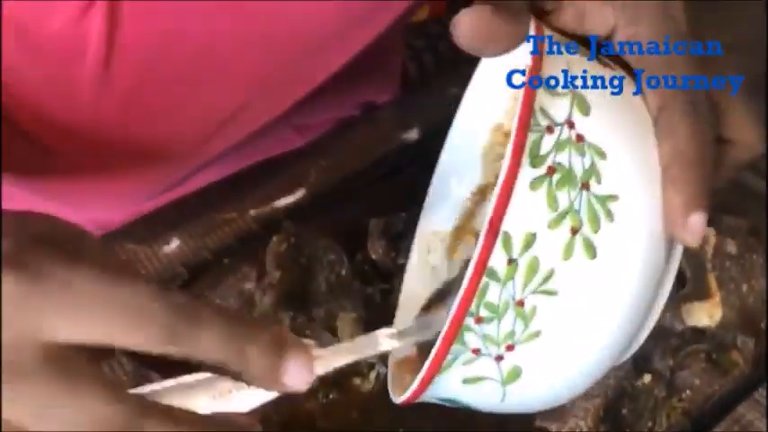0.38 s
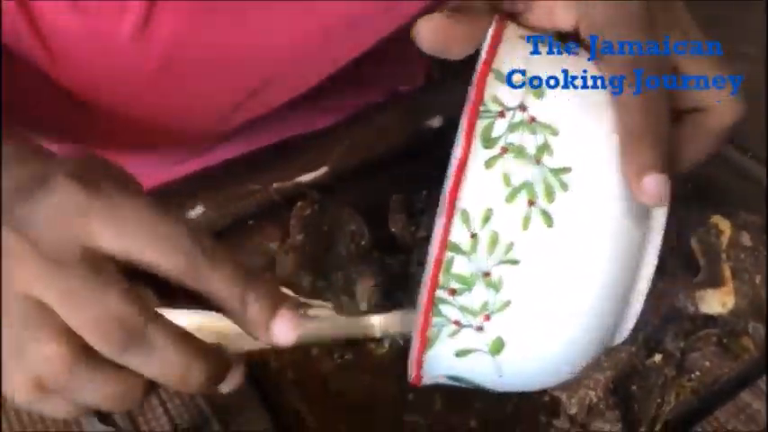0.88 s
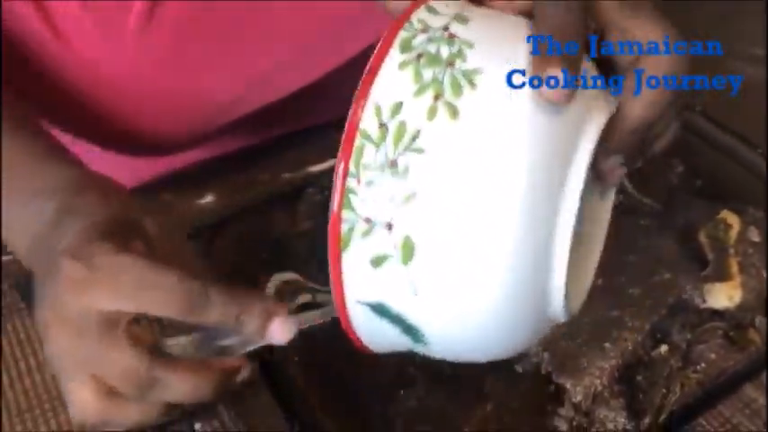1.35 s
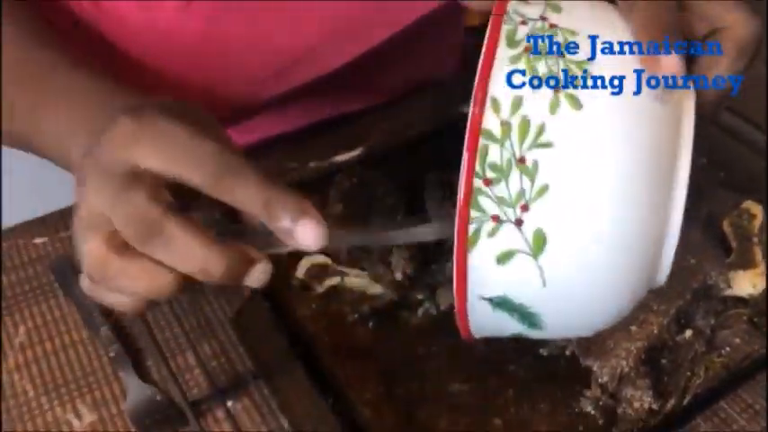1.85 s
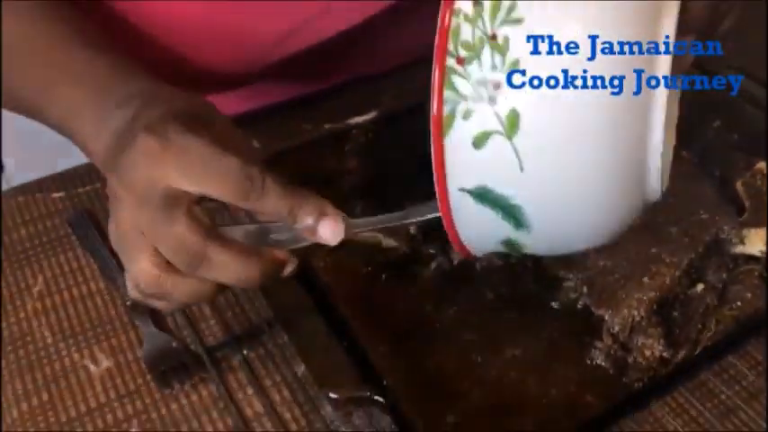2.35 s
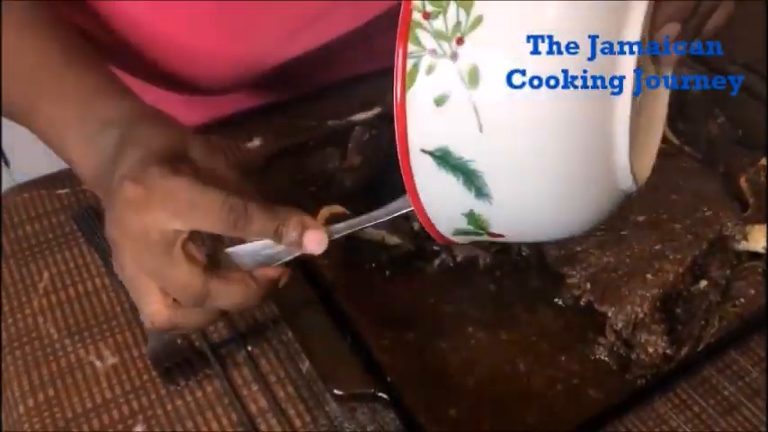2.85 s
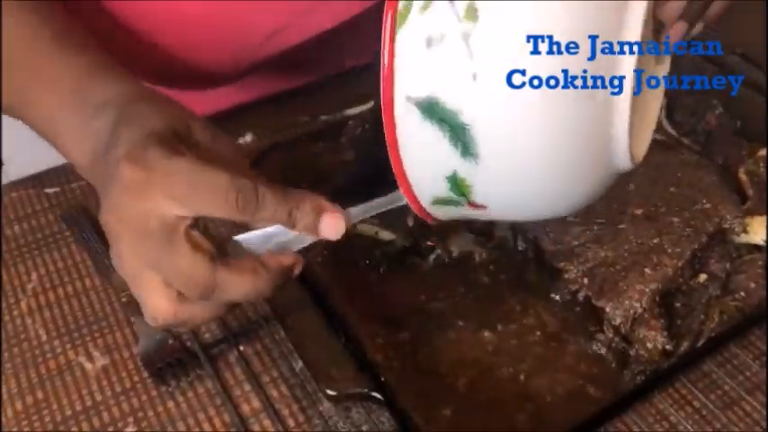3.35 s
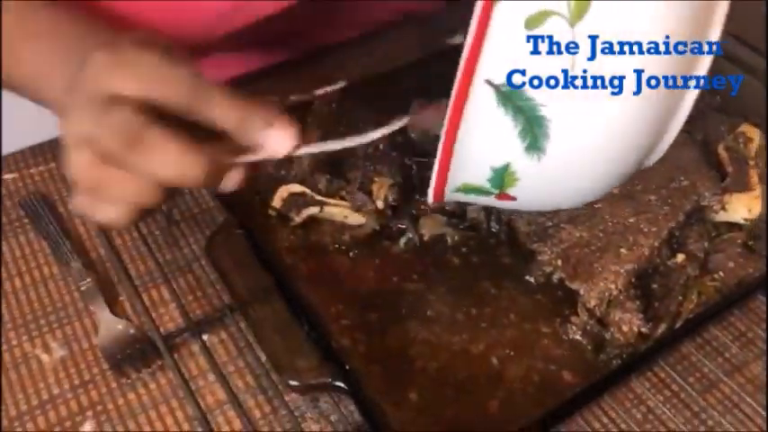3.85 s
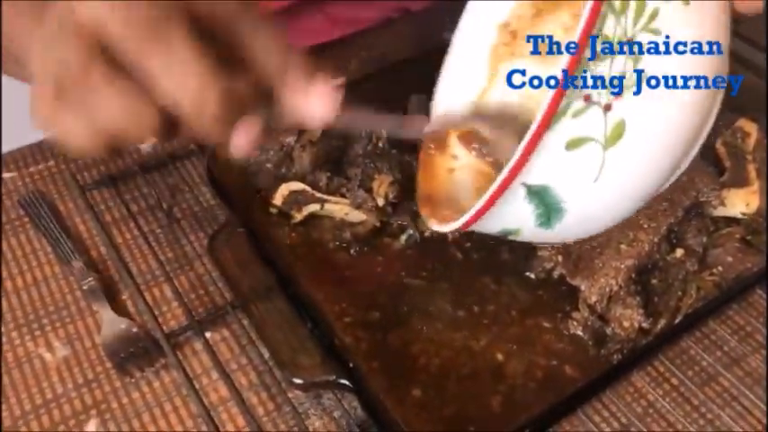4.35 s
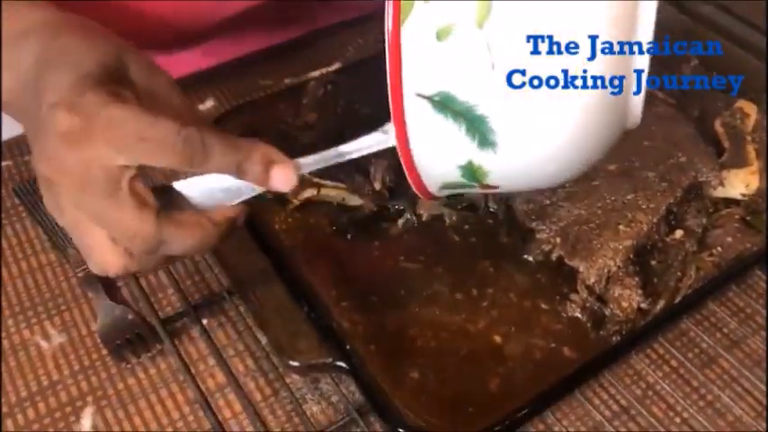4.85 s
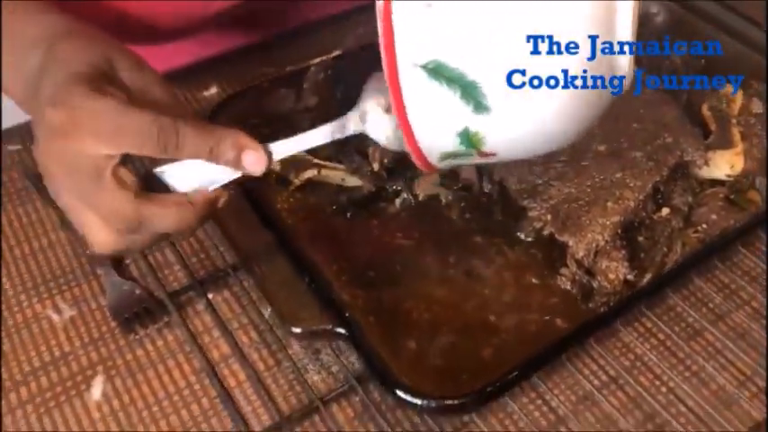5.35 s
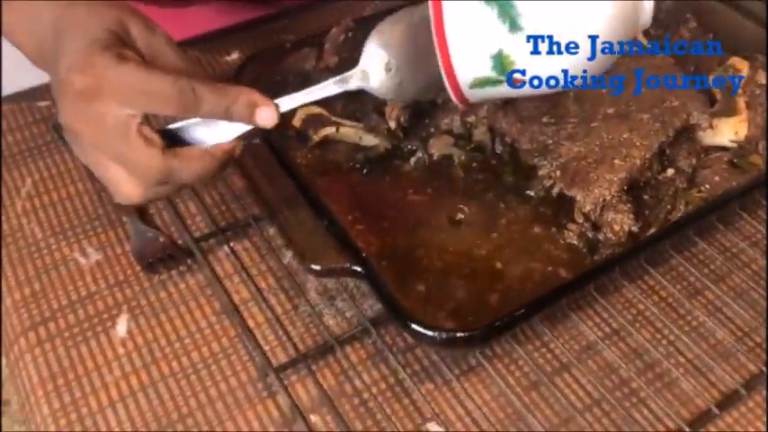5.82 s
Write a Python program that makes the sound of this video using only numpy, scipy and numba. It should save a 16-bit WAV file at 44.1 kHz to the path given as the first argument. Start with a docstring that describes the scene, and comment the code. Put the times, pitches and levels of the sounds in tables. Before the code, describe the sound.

A metal spoon scrapes sauce from a hand-held ceramic bowl in quick strokes, with sharp clinks, wet rising swishes and small squeaks in a quiet kitchen.

```python
"""A steel spoon scrapes sauce out of a hand-held ceramic bowl in a quiet kitchen, close to one microphone.
A low rumble and a faint hiss run throughout. The scene opens on the fading tail of a clink; then strokes land
with a clink, many bounce, and the spoon drags or sweeps along the glaze. Bowl and spoon ring as sets of fading
tones. The rubbing hisses through the air gap under the spoon at a rising pitch; at times the edge squeals.
Around 3 s the touches are soft; firmer strokes follow to the end. The room adds a short tail to all of them."""
import sys
import numpy as np
from scipy import signal
from scipy.fft import rfft, irfft
from scipy.io import wavfile
from scipy.ndimage import uniform_filter1d
from numba import njit

SR = 44100
rng = np.random.default_rng(int(sys.argv[2]) if len(sys.argv) > 2 else 0)


def natural_amplitude(level_db):
    """Convert a level in decibels to a linear amplitude factor, elementwise."""
    exponent = np.asarray(level_db, float) / 20
    return 10 ** exponent


def to_wav(sig):
    """Store sig (one row per channel, or 1-D mono) as 16-bit WAV at the path in sys.argv[1].

    Samples outside -1..1 are clipped; the rate is SR.
    """
    pcm = np.clip(np.atleast_2d(sig), -1, 1) * 32767
    pcm = np.round(pcm).astype(np.int16)
    wavfile.write(sys.argv[1], SR, pcm.T)  # frames by channels


N = 262836  # length in samples

# Blows of the spoon on the bowl, before hardness and chance change their tone:
# (time [s], crack level [dB], bowl ring level [dB], spoon ring level [dB], bowl's lowest mode level [dB])
BLOWS = [(0.2016, -3, -52, -17, -17), (0.4652, -4.5, -53, -23.5, -22), (0.5054, -5, -25, -15, -18.5),
         (0.5128, -18, -38, -24.5, -52), (0.7478, -3.5, -48, -19, -19.5),
         (0.9889, -5.5, -12.5, -26.5, -22.5), (1.0051, -17.5, -15, -23, -18.5),
         (1.0147, -8.5, -36, -23, -28), (1.0255, -4, -21, -19, -31), (1.141, -8.5, -21.5, -44, -45),
         (1.3658, -12, -44, -21, -28), (1.702, 0.5, -21.5, -23.5, -29), (1.8105, -20, -26, -65, -37.5),
         (1.975, -55, -49, -60, -73), (1.9977, -4.5, -15, -37, -31), (2.007, -24, -19, -25, -27),
         (2.0204, -22, -14, -36.5, -37.5), (2.319, -50, -63.5, -54, -65),
         (2.3407, -3.5, -13.5, -21.5, -22.5), (2.3551, -20, -7.5, -48, -13.5),
         (2.3992, -28.5, -18.5, -36, -46), (2.655, -50, -69, -64, -67.5), (2.6965, -9, -49, -18.5, -29),
         (2.724, -11.5, -21.5, -49.5, -57), (2.7624, -26.5, -34, -44, -57), (2.8579, -47, -30, -56, -66),
         (3.067, -45.5, -51.5, -59.5, -57), (3.1712, -47.5, -54, -62.5, -61), (3.3059, -7, -32.5, -23, -34),
         (3.437, -3, -12.5, -39, -32.5), (3.7805, -6.5, -13, -21.5, -28),
         (3.9094, -26.5, -16.5, -43.5, -60), (3.924, -27, -17.5, -55, -63),
         (4.2871, -10.5, -31, -29, -29.5), (4.297, -12.5, -64.5, -51, -66), (4.5396, -17, -23.5, -47, -62),
         (4.7742, -3.5, -15.5, -27, -25.5), (4.7873, -14, -33.5, -24.5, -61),
         (4.8457, -16, -23.5, -49.5, -33.5), (5.2241, -8.5, -18, -25.5, -18),
         (5.2353, -16, -21.5, -33.5, -20), (5.6983, -3, -11, -63, -13),
         (5.7125, -23.5, -16.5, -47.5, -16.5), (5.816, -35, -35, -48, -59), (5.9291, -36, -39, -69, -65)]
# Modes, the tones a body rings with; the hand-held bowl's come in close pairs. Blows vary them slightly:
# (frequency [Hz], relative level [dB], time to fade by 60 dB after a blow [s])
BOWL_MODES = [(939.4, -1.5, 0.1), (2180, -29.5, 0.18), (2270, 1, 0.07), (2316, -3, 0.057),
              (4068, 3.5, 0.039), (4117, -10.5, 0.16), (5970, -14.5, 0.024), (6280, -3, 0.041),
              (6378, -13.5, 0.15), (8896, -11.5, 0.06), (10050, -21, 0.048), (11200, -29, 0.093)]
# The spoon's modes: (frequency [Hz], relative level [dB], time to fade by 60 dB after a blow [s])
SPOON_MODES = [(1950, -13.5, 0.17), (2050, -11, 0.31), (2900, -12, 0.087), (3510, -26, 0.32),
               (4500, -1, 0.061), (4690, 0.5, 0.057), (5250, -4.5, 0.098), (5487, -27, 0.062),
               (6640, -36.5, .12), (7270, -1.5, 0.024), (7526, -1.5, 0.11), (8200, -5, 0.042),
               (7710, -17, .07), (9720, -11, 0.092), (10540, -10, 0.064), (11410, -13, 0.088),
               (12620, -18, 0.037)]


def unit(x):
    """Scales a sound to rms 1."""
    return x / np.sqrt(np.mean(x ** 2))


def shape(points, hz):
    """Reads the gain at hz from (frequency [Hz], level [dB]) points on a log-frequency axis."""
    f, db = np.transpose(points)
    return natural_amplitude(np.interp(np.log(hz + 1), np.log(f), db))


def coloured(x, points):
    """Filters a sound with a curve of (frequency [Hz], level [dB]) points."""
    gain = shape(points, np.fft.rfftfreq(len(x), 1 / SR))
    return irfft(rfft(x) * gain, len(x))


def pole(hz, t60):
    """Gives one sample's turn and decay of a mode, as a complex factor."""
    return np.exp(2j * np.pi * hz / SR - np.log(1000) / (t60 * SR))


def walk(rate):
    """Wanders at random with a spread near 1: levels held for 1 / rate seconds, then smoothed twice."""
    hold = int(SR / rate)
    steps = np.repeat(rng.standard_normal(N // hold + 1), hold)
    smooth = uniform_filter1d(uniform_filter1d(steps, hold), hold)
    return unit(smooth[:N])


def flutter(rate):
    """Wanders as a complex number of power near 1, to unsettle a tone's size and phase."""
    return (walk(rate) + 1j * walk(rate)) / np.sqrt(2)


@njit
def svf(x, hz, sharp):
    """Band-pass filter, a resonance with a moving centre and gain 1 there."""
    y, band, low, damping = np.empty(len(x)), 0., 0., 1 / sharp
    for i in range(len(x)):
        g = np.tan(np.pi * hz[i] / SR)
        v = (band + g * (x[i] - low)) / (1 + g * (g + damping))
        band, low, y[i] = 2 * v - band, low + 2 * g * v, damping * v
    return y


def room_tone():
    """Filtered noise makes a faint hiss; noise through a wavering low resonance makes the rumble."""
    # Spectrum of the hiss: (frequency [Hz], relative level [dB])
    hiss_colour = [(24, -36), (40, -5.5), (267, -3.5), (576, -17), (733, -15), (827, -13), (1510, -21.5),
                   (2820, -29.5), (5790, -29.5), (11100, -42), (12500, -55), (16200, -84.5), (22000, -120)]
    hiss_db, rumble_hz, rumble_db = -53, 66.5, -56.5  # middle values, which waver below
    hiss = unit(coloured(rng.standard_normal(N), hiss_colour))
    hiss = hiss * natural_amplitude(hiss_db + 2.1 * walk(2.9))
    moving_hz = rumble_hz * (1 + 0.11 * walk(1.3))
    rumble = unit(svf(rng.standard_normal(N), moving_hz, 3.2))
    return hiss + rumble * natural_amplitude(rumble_db + 0.46 * walk(7.5))


def kitchen(x, gap_s=0.0013):
    """Dense reflections, built as bands of fading noise, with fade times that depend on pitch."""
    # Fade of the room: (frequency [Hz], time to fade by 60 dB [s])
    tail = [(500, 0.19), (2000, 0.4), (5000, 0.43), (10000, 0.073)]
    t = np.arange(SR // 2) / SR
    hz, t60 = np.transpose(tail)
    echo = 0
    for f in 500 * 2. ** np.arange(0, 5):
        octave = signal.butter(2, [f / 1.41, f * 1.41], "bandpass", fs=SR, output="sos")
        band = signal.sosfilt(octave, rng.standard_normal(len(t)))
        echo = echo + band * natural_amplitude(-60 * t / np.interp(np.log(f), np.log(hz), t60))
    echo = echo * (1 - np.exp(-t / gap_s))  # the echo swells in
    return signal.fftconvolve(x, echo / np.sqrt(np.sum(echo ** 2)))[:N]


def squeals(lean=0.9):
    """Short, rough tones glide, swell and fade as the spoon's edge sticks and slips."""
    # Squeals, level before roughness:
    # (start time [s], length [s], start frequency [Hz], end frequency [Hz], level [dB])
    glides = [(.268, 0.013, 2050, 2040, -35.5), (.274, 0.009, 3250, 3250, -36),
              (.572, 0.03, 2146, 1820, -38), (.818, 0.028, 2110, 2050, -45),
              (1.403, 0.05, 2095, 1806, -32.5), (1.408, 0.017, 3900, 3900, -32.5),
              (2.853, .021, 2490, 2580, -34), (2.84, .07, 3000, 3250, -39.5),
              (3.4, 0.073, 2080, 2050, -38.5), (3.855, 0.063, 1950, 2050, -38),
              (3.88, 0.069, 4490, 4500, -32), (3.89, .04, 2100, 2490, -36),
              (3.92, 0.031, 1900, 1900, -32.5), (3.96, 0.036, 3200, 3190, -38.5),
              (4.38, 0.067, 5430, 5400, -46), (4.395, 0.13, 1843, 2350, -38.5),
              (4.45, 0.04, 4500, 4130, -34.5), (4.47, 0.088, 2544, 2850, -41.5),
              (4.49, 0.073, 2085, 2250, -41), (4.505, 0.0665, 3170, 3400, -33.5),
              (4.51, .09, 4500, 5000, -39.5), (4.56, 0.058, 3095, 3270, -45), (5.3, 0.12, 2353, 2900, -39),
              (5.365, 0.076, 1873, 2130, -40), (5.37, 0.058, 2900, 3000, -45),
              (5.79, 0.05, 1573, 2070, -43.5), (5.79, .06, 2400, 3000, -40.5),
              (5.81, 0.058, 4240, 4390, -39), (5.83, 0.08, 3180, 3400, -51)]
    out = np.zeros(N)
    shake = .4 + .9 * flutter(300)
    for k, (s, length, from_hz, to_hz, db) in enumerate(glides):
        u = np.linspace(0, 1, int(length * SR))
        hz = from_hz * (to_hz / from_hz) ** u
        turn = np.exp(2j * np.pi * np.cumsum(hz) / SR)
        i = int(s * SR)
        rough = np.roll(shake, 7919 * k)[i:i + len(u)]  # another stretch for each squeal
        swell = np.sin(np.pi * u ** lean)
        out[i:i + len(u)] += natural_amplitude(db) * np.sqrt(2) * swell * (turn * rough).imag
    return out


def contacts():
    """Adds up all drags and sweeps into gains over time of hiss, bowl and spoon, and the gap's pitch."""
    # Drags after a landing; the first row is the fading tail of a clink:
    # (time [s], hiss level [dB], hold [s], bowl over hiss [dB], spoon over hiss [dB])
    landings = [(0.001, -42.5, .012, -13, -4.5), (0.214, -45.5, 0.012, -14.5, 9),
                (0.508, -45.5, 0.02, -17.5, 11), (0.759, -47.5, 0.048, -17, 3),
                (1.017, -29.5, 0.024, -4, -11), (1.142, -52.5, .021, 4, -8),
                (1.377, -46.5, 0.035, -16.5, 4), (1.704, -34.5, 0.01, 5, -5.5),
                (1.795, -42.5, 0.0049, 2.5, -31.5), (2.016, -25.5, .03, -12.5, -21),
                (2.341, -27, 0.038, 2.5, -12), (2.732, -33.5, 0.054, -4.5, -36),
                (3.319, -53.5, 0.034, -13, 9.5), (3.446, -33.5, .03, -17, -20),
                (3.788, -40, .025, -10.5, 0), (3.896, -35, .015, -17.5, -22), (4.311, -53, .11, 0, 4),
                (4.539, -42.5, .021, -21, -13), (4.784, -39, .015, -13, -8), (4.848, -36.5, .04, -10, -29),
                (5.243, -49, .05, 0, 2.5), (5.709, -33.5, .03, -9, -9.5)]
    # Sweeps, where the edge leans in and wipes sauce along:
    # (peak time [s], hiss level [dB], build-up [s], gap resonance at the peak [Hz])
    wipes = [(0.285, -39, 0.023, 2170), (1.415, -43.5, .021, 1984), (1.75, -31.5, 0.028, 2900),
             (2.08, -40.5, 0.031, 2550), (2.44, -29.5, 0.092, 2720), (2.865, -40, 0.027, 2800),
             (2.929, -50, 0.1, 3220), (3.075, -51, 0.63, 3494), (3.915, -25.5, 0.024, 2388),
             (3.994, -44, .08, 3156), (4.48, -37, 0.061, 2500), (4.55, -32, 0.12, 3130),
             (4.598, -42.5, .08, 3300), (4.95, -41, 0.033, 2980), (5.048, -51, 0.34, 2967),
             (5.376, -29, .06, 2680), (5.449, -39.5, 0.15, 2900), (5.84, -34.5, 0.032, 2780),
             (5.93, -38.5, .06, 2370)]
    attack_s, build_db = 0.0042, 25  # a contact climbs by build_db during its attack or build-up
    fade_db_per_s, lift_db_per_s = 229, 454  # every drag fades at one shared pace; every sweep lifts away faster
    drag_gap_hz, rise_oct_per_s = 2250, 4  # the gap closes as the spoon nears the rim
    sweep_ring_db = -35  # both bodies, over the hiss; sauce muffles them
    rows = []
    for s, db, hold, bowl_db, spoon_db in landings:
        rows.append((s, db, attack_s, hold, fade_db_per_s, drag_gap_hz, bowl_db, spoon_db))
    for s, db, build, hz in wipes:
        rows.append((s, db, build, 0, lift_db_per_s, hz, sweep_ring_db, sweep_ring_db))
    hiss, bowl, spoon, octaves = np.full((4, N), 1e-9)
    for s, db, build, hold, fade, hz, bowl_db, spoon_db in rows:
        t = np.arange(N) / SR - s
        gain = natural_amplitude(db + build_db * np.minimum(t, 0) / build - fade * np.maximum(t - hold, 0))
        hiss = hiss + gain
        bowl = bowl + gain * natural_amplitude(bowl_db)
        spoon = spoon + gain * natural_amplitude(spoon_db)
        # the stronger contact counts more in the pitch, in octaves from 2500 Hz
        octaves = octaves + gain * (np.log2(hz / 2500) + rise_oct_per_s * np.clip(t, -.08, .15))
    return hiss, bowl, spoon, 2500 * 2 ** (octaves / hiss)


def rubbed(force, modes):
    """Friction drives a body's modes; touch shortens the ring, and each mode's drive wanders in level."""
    out = 0
    for hz, db, t60 in modes:
        p = pole(hz, .55 * t60)
        moving_force = force * natural_amplitude(3.5 * walk(18))  # the moving contact favours one mode after another
        ring = signal.lfilter([np.sqrt(1 - abs(p) ** 2)], [1, -p], moving_force)
        out = out + natural_amplitude(db) * ring.imag
    return out


def rasp(slips, t60=.11):
    """Grit is heard bare and through the crowd of minor modes between the main ones."""
    # Spectrum of the rasp: (frequency [Hz], relative level [dB])
    colour = [(500, -36), (1200, -43), (2000, -15.5), (3500, 1), (6000, 8), (9000, -16.5), (12500, -15)]
    minor_hz = 1200 * 1.06 ** (np.arange(40) + rng.uniform(-.4, .4, 40))
    minor = [(f, 20 * np.log10(shape(colour, f) * np.sqrt(f)), t60) for f in minor_hz]
    ringing = unit(rubbed(slips, minor))
    bare = unit(coloured(slips, colour))
    return natural_amplitude(-18.5) * ringing + natural_amplitude(-17) * bare


def drags():
    """Dense stick-slip grit drives the air gap under the spoon and both bodies."""
    hiss, on_bowl, on_spoon, gap_hz = contacts()
    grit_db = 1.5 * rng.exponential(size=N) + 2.3 * walk(120)
    slips = unit(rng.standard_normal(N) * natural_amplitude(grit_db))
    gap_hz = gap_hz * (1 + 0.019 * walk(30))
    sharp = 12.
    gap = natural_amplitude(-5) * unit(svf(slips, gap_hz, sharp)) * natural_amplitude(4.0 * walk(60))
    # the gap's second resonance lies 1.45 times higher
    upper = unit(svf(slips, 1.45 * gap_hz, 2 * sharp))
    gap = gap + natural_amplitude(-15) * upper * natural_amplitude(6.1 * walk(44))
    bowl = rubbed(slips * on_bowl, BOWL_MODES)
    spoon = rubbed(slips * on_spoon, SPOON_MODES)
    return hiss * (gap + rasp(slips)) + natural_amplitude(-11.0) * bowl + spoon


def hardness():
    """Tilts each blow's tone, in dB per octave; louder cracks and quick bounces are harder."""
    # Hardness varies from blow to blow, interpolated between these times: (time [s], tilt [dB per octave])
    tilts = [(.2, 5), (.99, -1), (1.37, 7.5), (2.0, 2), (2.4, 0.5), (2.75, 0.5), (3.44, 6.5), (4.5, 9),
             (4.8, -1.5), (5.23, 10.5), (5.7, 1.4)]
    bounce_s, bounce_tilt = .015, 2.5  # a blow this soon after another is a bounce; its extra dB per octave
    tilt_per_db = 0.13  # dB per octave for each dB of crack
    s, crack_db = np.transpose(BLOWS)[:2]
    is_bounce = np.diff(s, prepend=0) < bounce_s
    return np.interp(s, *np.transpose(tilts)) + tilt_per_db * crack_db + bounce_tilt * is_bounce


def cracks(rise_s=0.0038, fall_s=0.003):
    """A short puff of broad noise as steel meets glaze, brighter for a harder blow."""
    # Spectrum of a crack before the hardness tilt: (frequency [Hz], relative level [dB])
    crack_colour = [(300, -37.5), (600, -16), (1000, 6.5), (2000, 1), (4000, 9.5), (7000, 6.5),
                    (10000, -3.5), (12500, -5)]
    out, t = np.zeros(N + 2048), np.arange(2048) / SR
    puff = (1 - np.exp(-t / rise_s)) * np.exp(-t / fall_s)
    for (s, db, *_), hard in zip(BLOWS, hardness()):
        colour = [(f, g + 0.27 * hard * np.log2(f / 4000)) for f, g in crack_colour]
        i = int(s * SR)
        out[i:i + 2048] += natural_amplitude(db) * puff * unit(coloured(rng.standard_normal(2048), colour))
    return out[:N]


@njit
def strike(out, starts, poles, gains, pushes, shake, skips, unsettle):
    """Every blow builds up every mode over its push; the lingering touch then shakes what rings on."""
    for e in range(len(starts)):
        for k in range(poles.shape[1]):
            z, i, left, clean = gains[e, k], starts[e], 1., 1.
            while i < len(out) and abs(z.real) + abs(z.imag) > 1e-5:
                wobble = clean + (1 - clean) * shake[(i + skips[k]) % len(out)]
                out[i] += (1 - left) * (z * wobble).imag
                z, left, clean = z * poles[e, k], left * pushes[e], clean * unsettle
                i += 1
    return out


def clinks(push_s=0.00016, unsettle_s=0.016):
    """Each blow rings both bodies on another spot; a harder contact favours the upper modes."""
    s, crack_db, bowl_db, spoon_db, low_db = np.transpose(BLOWS)[:, :, None]
    hard = hardness()[:, None]
    hz, db, t60 = np.transpose(BOWL_MODES + SPOON_MODES)
    is_bowl = np.arange(len(hz)) < len(BOWL_MODES)
    body_db = np.where(is_bowl, bowl_db, spoon_db) + hard * np.log2(hz / 4000)
    body_db[:, :1] = low_db  # the bowl's lowest mode has its own level
    # the spot changes pitch, fade time, level and phase a little by chance
    chance = rng.standard_normal((len(s), 4 * len(hz))).reshape(len(s), 4, -1)
    poles = pole(hz * (1 + .003 * chance[:, 0]), t60 * np.exp(.12 * chance[:, 1]))
    gains = natural_amplitude(body_db + db + 2.2 * chance[:, 2]) * np.exp(2j * chance[:, 3])
    # a glancing blow, all ring and little crack, pushes for longer than push_s
    glance_db = np.clip(np.maximum(bowl_db, spoon_db) - crack_db, 0, 14)[:, 0]
    pushes = np.exp(-1 / (SR * push_s * natural_amplitude(2.5 * glance_db)))
    starts = (s[:, 0] * SR).astype(np.int64)
    skips = rng.integers(N, size=len(hz))  # each mode reads another stretch of the shaking
    unsettle = np.exp(-1 / (SR * unsettle_s))
    return strike(np.zeros(N), starts, poles, gains, pushes, flutter(130), skips, unsettle)


def scene():
    """Adds up spoon and bowl close by, their echo and the room tone."""
    near = clinks() + cracks() + drags() + squeals()
    # the close sounds keep little below 600 Hz
    near = signal.sosfilt(signal.butter(4, 600, "highpass", fs=SR, output="sos"), near)
    return (near + natural_amplitude(-18.5) * kitchen(near) + room_tone())[None]


def band_limit(x):
    """A steep low-pass at the top of the band."""
    return signal.sosfilt(signal.butter(12, 13140, fs=SR, output="sos"), x)


def record(dry):
    """The microphone loses the lowest and the highest tones, below 42 Hz and above 11900 Hz."""
    x = signal.sosfilt(signal.butter(4, 42, "highpass", fs=SR, output="sos"), dry)
    x = signal.sosfilt(signal.ellip(8, .3, 60, 11900, fs=SR, output="sos"), x)
    return band_limit(x)


dry = scene()
out = record(dry)
to_wav(out)
```